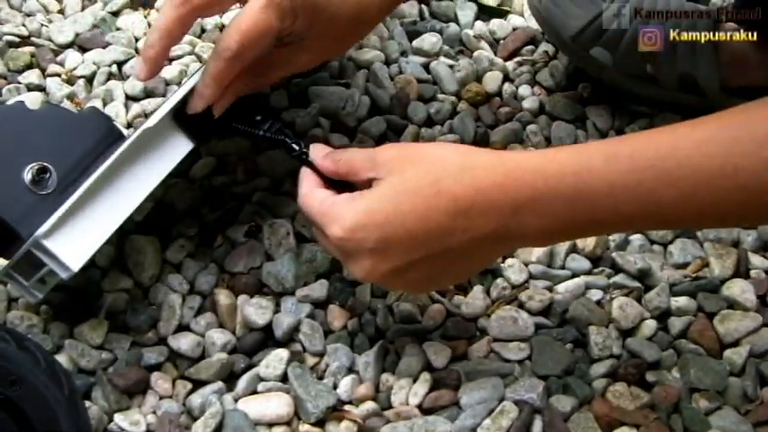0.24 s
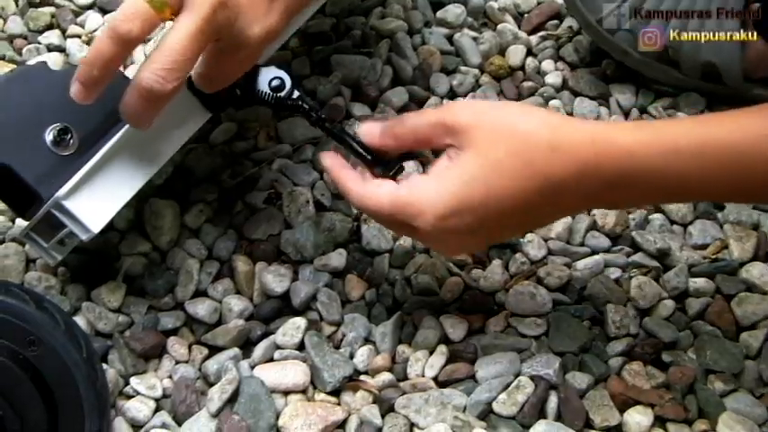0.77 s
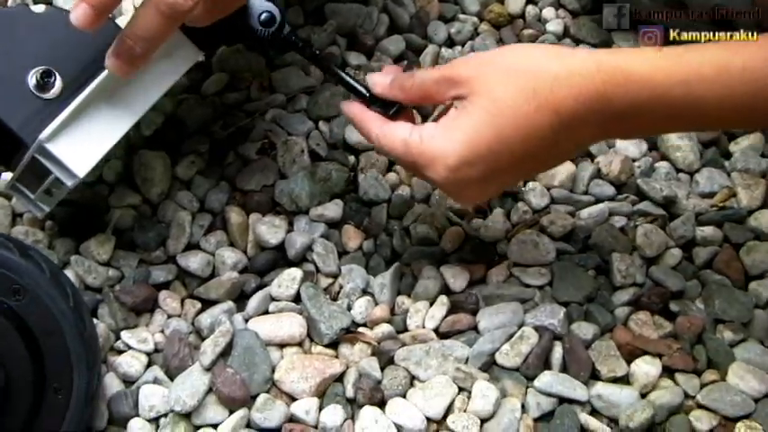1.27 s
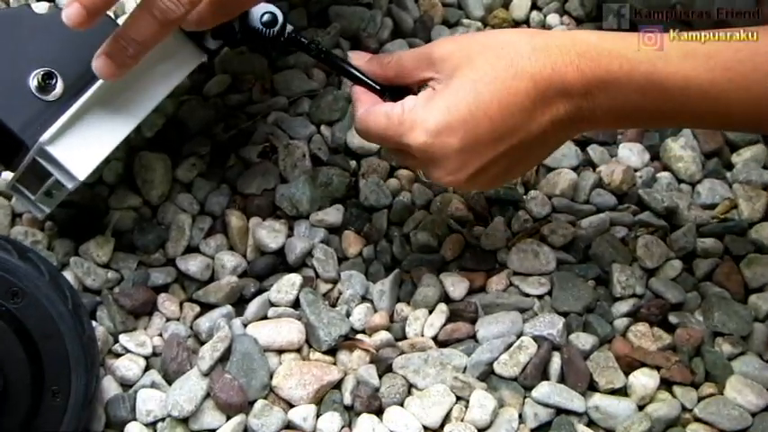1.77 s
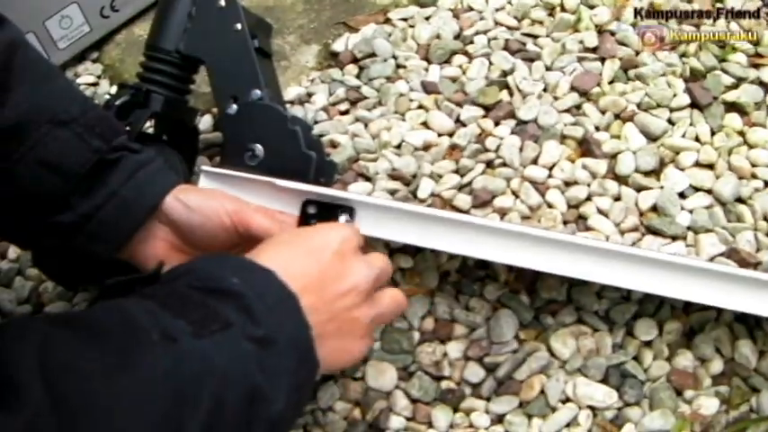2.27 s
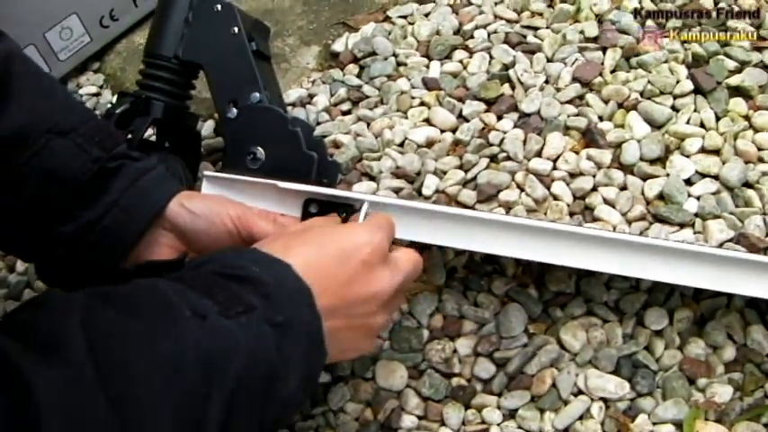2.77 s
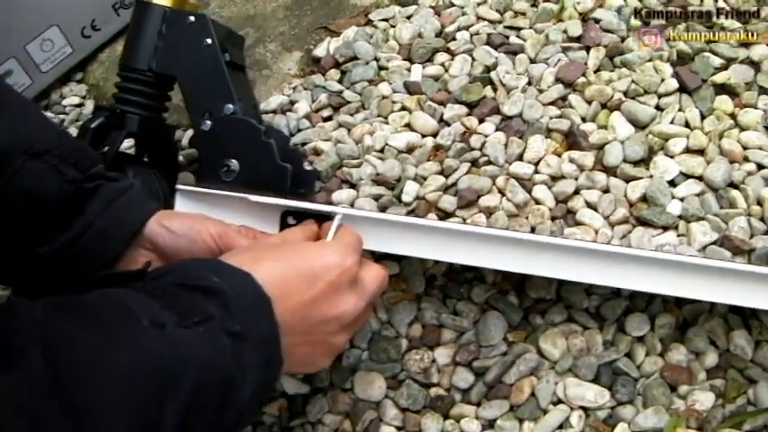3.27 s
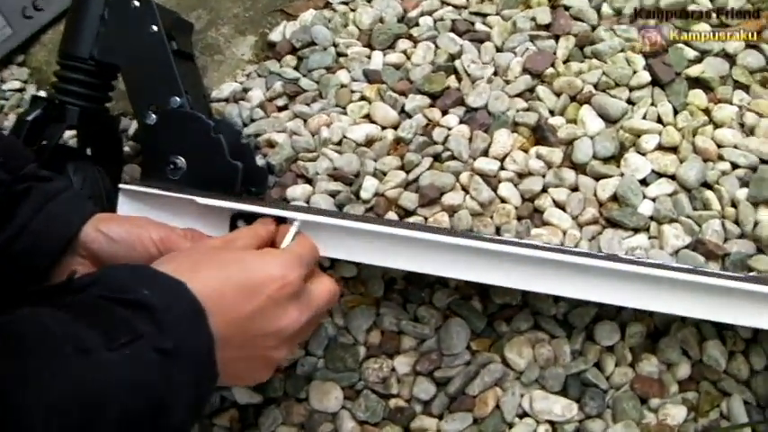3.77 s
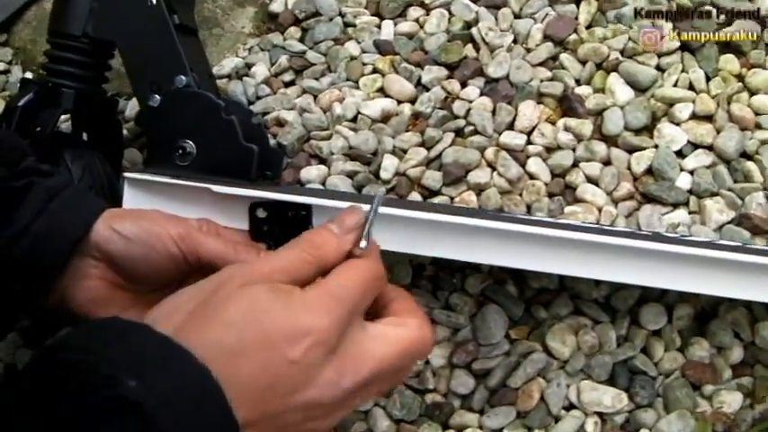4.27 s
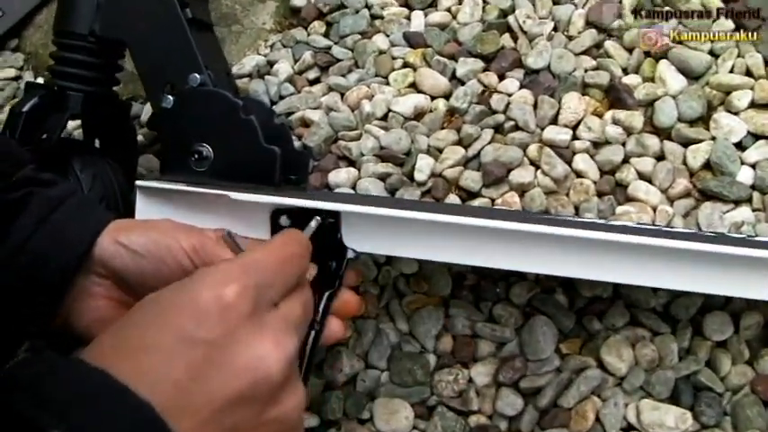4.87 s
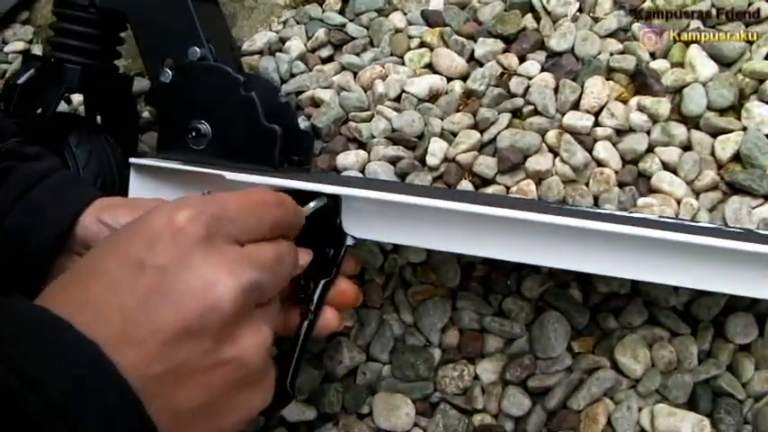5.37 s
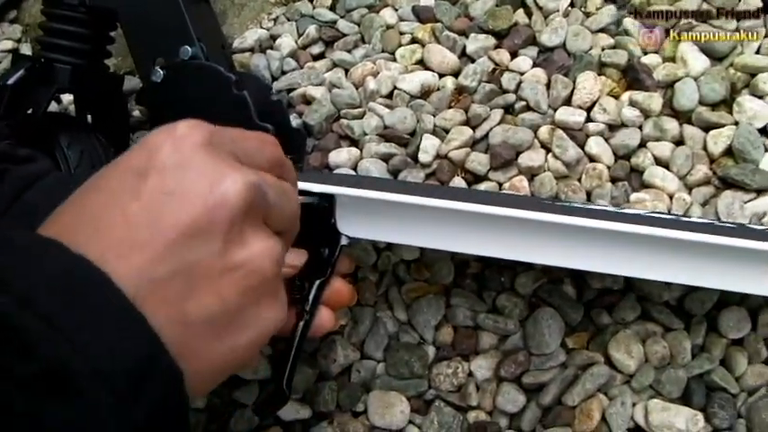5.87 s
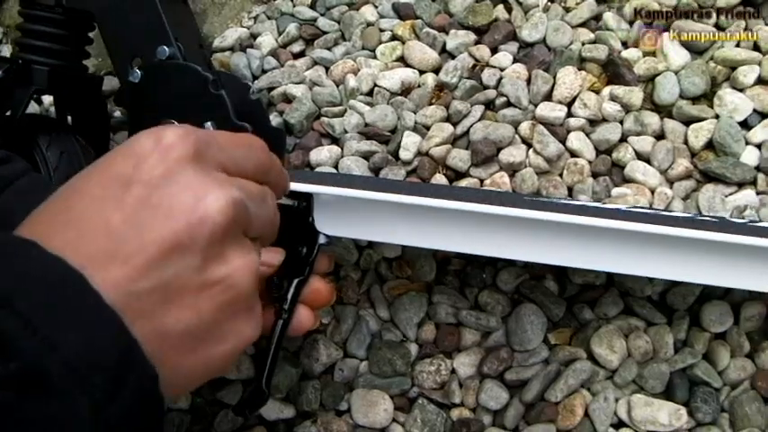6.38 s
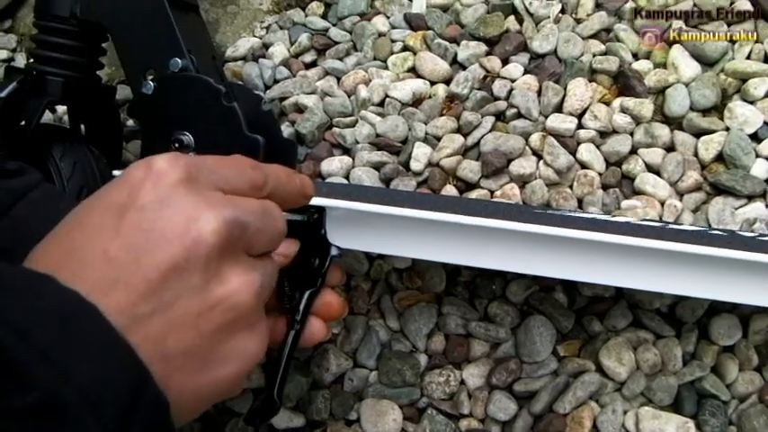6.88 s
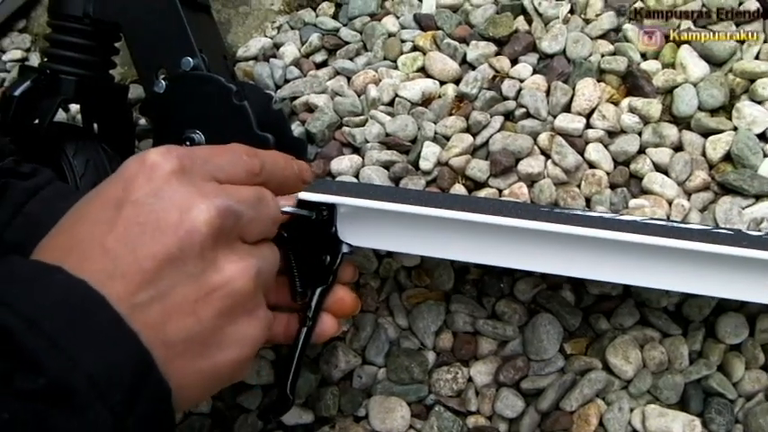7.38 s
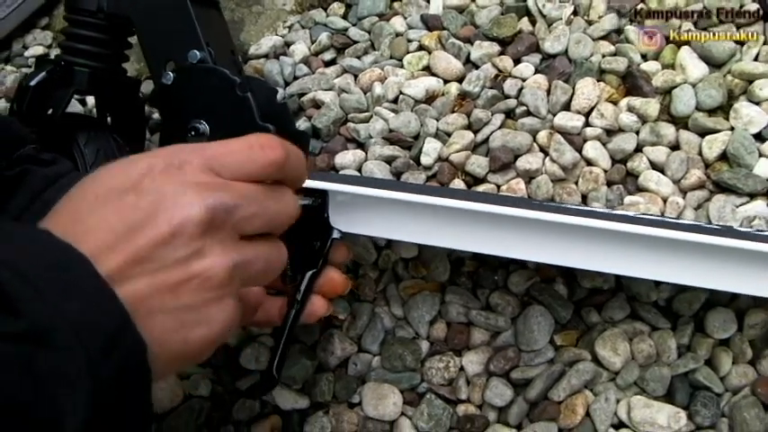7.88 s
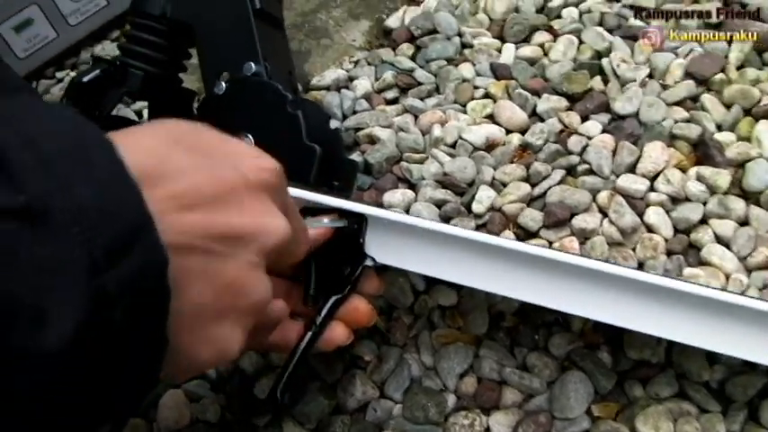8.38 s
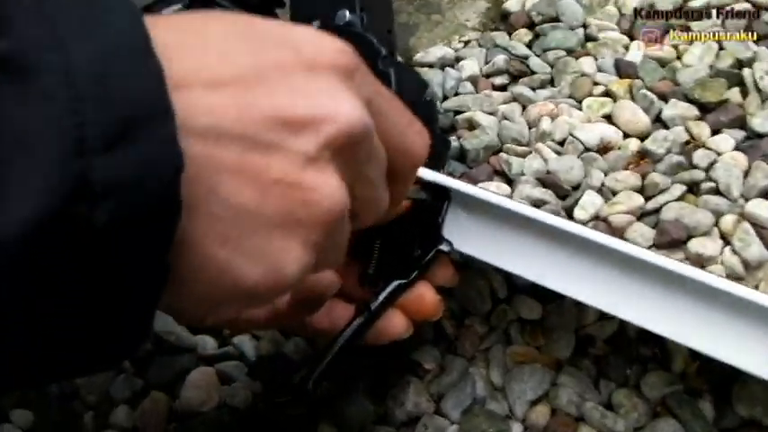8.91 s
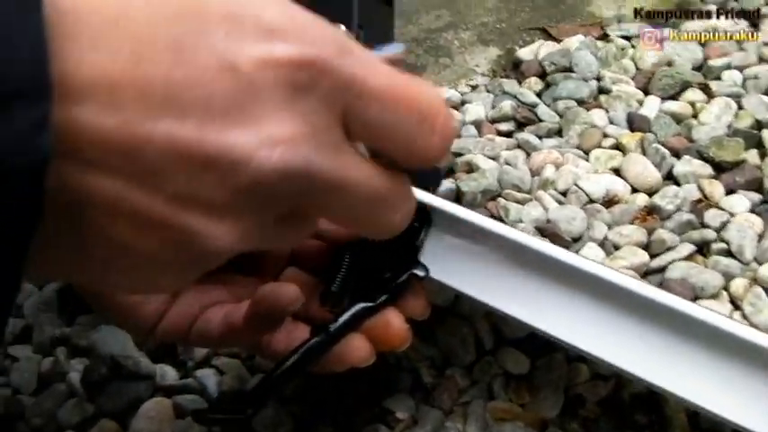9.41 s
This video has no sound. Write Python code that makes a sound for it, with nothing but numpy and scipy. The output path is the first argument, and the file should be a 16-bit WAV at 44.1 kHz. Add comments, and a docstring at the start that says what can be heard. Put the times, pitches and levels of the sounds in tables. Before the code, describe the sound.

Close, dry stereo handling outdoors, over faint low rumble and soft hiss. From 0 to 0.6 s fingers rub and small ticks cluster around 0.4, with a weak hum until 0.7. At 0.95-1.2 a tool knocks a hollow aluminium tube, ringing briefly, with rubbing and ticks; lighter knocks continue to 1.75. Complete silence from 1.8 to 2.05, then the air returns with a barely audible wavering drone. A bright steel clink at 2.27 has a weaker repeat at 2.33. Between 2.6 and 4 s, sleeve and skin rub with soft low bumps, gritty ticks and a tiny high squeak at 3.29. The loudest event is a rapid lever clack at 4.71. Ticks follow near 5.15, a smaller clack at 6.05, then sparse faint contacts. Rubbing and crisp ticks build at 8.2-8.5, with a firm thock at 8.81 and fading rubs past 9.

```python
"""Putting a scooter together

Hands assemble a scooter on gravel outdoors, heard close by in stereo.
A ratchet wrench knocks on the hollow aluminium stem, which rings as a sum of fading sine waves.
After a short silence a bolt is worked into the folding clamp: dry noise-burst ticks, ringing steel clinks
and one loud clack of the lever. Skin, cuffs and sleeves rub as shaped noise over a quiet outdoor rumble and hiss.
"""
import sys
import numpy as np
from scipy import signal
from scipy.fft import rfft, irfft, next_fast_len
from scipy.io import wavfile
from scipy.ndimage import uniform_filter1d

SR = 44100
rng = np.random.default_rng(int(sys.argv[2]) if len(sys.argv) > 2 else 0)


def to_wav(s):
    """Save 16-bit WAV."""
    ch = np.atleast_2d(s).T  # columns
    pcm = np.round(np.clip(ch, -1, 1) * 32767)  # PCM
    wavfile.write(sys.argv[1], SR, pcm.astype(np.int16))


N = 425556
TIME = np.arange(N) / SR  # seconds
RING = np.arange(SR // 3) / SR  # seconds since a hit; "t60" below is the time to fade by 60 dB

# Background: colour of the outdoor air. Each row: frequency in Hz, relative level in dB per Hz.
AIR_COLOUR = [(25, -4.5), (50, -4.5), (85, 8), (120, 7.5), (170, -0.5), (260, -13.5), (390, -3),
              (520, -9.5), (1000, -15.5), (1700, -14), (4500, -15), (7500, -16.5), (11000, -20.5),
              (16000, -24)]
# How much the air differs between left and right. Each row: frequency in Hz, side minus mid in dB.
AIR_WIDTH = [(60, -21), (110, -27), (200, -12.5), (380, -14), (700, -9.5), (1290, -8.5), (2380, -8),
             (4400, -4), (8120, -0.5), (15000, 1.5)]
# The same for the near sounds. Each row: frequency in Hz, side minus mid in dB.
NEAR_WIDTH = [(1000, -24.5), (2500, -42), (5000, -15.5), (8000, -6), (12000, -3)]
# Colour the microphone ports give to near sounds. Each row: frequency in Hz, gain in dB.
PORT_COLOUR = [(6000, -0.5), (6700, -1), (7300, 4), (7620, 2), (7850, -9.5), (8150, 1), (8800, -2.5),
               (9800, -0.5), (10800, 6.5), (12200, 0), (14000, -8.5)]
# The jacket sleeve brushes the frame. Each row: time of the peak in seconds, level in dB, length in seconds.
SLEEVE_STROKES = [(2.65, -60.5, 0.75), (2.98, -57.5, 0.2), (3.62, -67, .6), (8.85, -80, 2.6)]
# Fingers and cuffs stroke the parts. Each row: time of the peak in seconds, level in dB, length in seconds.
HAND_STROKES = [(.03, -57, 0.47), (.42, -52.5, .2), (.84, -50, 0.48), (.95, -49, 0.14), (1.15, -47.5, 0.11),
                (1.35, -51.5, 0.21), (2.62, -58, 0.91), (2.99, -52.5, 0.19), (3.315, -48.5, 0.19),
                (3.4, -57, 0.063), (3.56, -49, 0.064), (3.625, -45, 0.11), (3.96, -52, 0.17),
                (4.35, -50.5, 0.34), (4.47, -48.5, 0.17), (4.805, -43.5, 0.11), (5.12, -58, 0.38),
                (7.65, -57.5, 0.24), (8.23, -55, 0.5), (8.45, -44.5, 0.15), (8.63, -54.5, 0.5),
                (8.865, -47, 0.18), (9.01, -50.5, 0.52), (9.2, -58, 0.45)]
# Colour of rubbing cloth and skin. Each row: frequency in Hz, relative level in dB per Hz.
CLOTH_COLOUR = [(200, -25), (500, 0.5), (1000, -11), (1900, 2.5), (4000, 1), (6500, 2), (12000, -8.5),
                (16000, -6)]
# Soft bumps of the hands on the frame. Each row: start in seconds, level in dB.
HAND_BUMPS = [(2.724, -41.5), (2.989, -48), (3.228, -45.5), (3.671, -44), (3.728, -41.5)]
# Hollow thocks of the firmest contacts. Each row: start in seconds, level in dB.
THOCK_HITS = [(.412, -48.5), (8.473, -51), (8.8105, -47)]
# Light touches that ring one note of a small steel part. Each row: start in seconds, level in dB, pitch in Hz.
PING_NOTES = [(1.157, -41, 6320), (1.492, -49.5, 6800), (1.649, -48, 3280), (3.279, -45, 6100),
              (5.26, -52.5, 4050), (6.87, -59, 6050)]
# Dry contacts of tool, bolt and clamp. Each row: start in seconds, level in dB, centre in Hz, t60 in seconds.
TICK_HITS = [(.186, -43.5, 3960, .017), (0.3518, -48, 2290, 0.016), (.3753, -46, 4770, .006),
             (.3907, -48, 2800, .03), (.3984, -40.5, 3920, 0.0043), (.412, -37, 3700, 0.014),
             (0.8228, -44.5, 8000, .009), (.9497, -51, 4480, .02), (.978, -45, 4960, .04),
             (1.058, -48, 4470, .015), (1.1386, -38, 4400, .026), (1.1452, -42, 3200, .01),
             (1.3212, -47.5, 4700, 0.01), (1.339, -45, 5830, 0.025), (1.452, -43.5, 4600, 0.011),
             (2.9288, -43, 4030, 0.0067), (2.9833, -52, 3800, 0.0068), (2.9884, -33, 4350, .003),
             (3.231, -39.5, 6750, 0.0023), (3.2626, -46, 4500, .008), (3.298, -37, 4330, 0.062),
             (3.3143, -45, 5700, .018), (3.3269, -42, 4000, 0.041), (3.34, -41, 5800, 0.011),
             (3.4, -47.5, 2600, .045), (3.4643, -47.5, 6660, .013), (3.534, -44.5, 3500, 0.038),
             (3.5679, -32.5, 7300, 0.0042), (3.6182, -46, 2700, .045), (3.978, -44.5, 2870, 0.019),
             (4.0772, -47.5, 3400, .02), (4.359, -46.5, 4200, .015), (4.4389, -47, 4200, 0.0051),
             (4.474, -46, 2720, 0.034), (4.783, -40.5, 5000, .009), (4.7872, -40, 5000, .012),
             (4.883, -47.5, 4450, 0.0052), (5.144, -42, 3820, 0.032), (5.162, -39, 5900, .024),
             (5.1702, -39, 6330, 0.023), (6.048, -38, 4750, 0.014), (7.424, -45, 3770, 0.027),
             (7.561, -53, 3500, 0.022), (7.622, -48, 3060, 0.034), (8.1945, -48.5, 7000, .02),
             (8.396, -43, 5000, 0.0079), (8.428, -39, 4370, 0.026), (8.4465, -39.5, 4700, .018),
             (8.47, -35.5, 2920, 0.0073), (8.4725, -32, 7400, 0.0052), (8.4923, -46, 3900, .005),
             (8.538, -49, 4800, .015), (8.8103, -37.5, 2150, 0.0081), (8.828, -45, 8000, .01)]
# The bolt squeaks in its hole. Each row: start in seconds, level in dB, brightness in Hz.
BOLT_SQUEAKS = [(3.2855, -35, 13000), (3.288, -41, 12900)]
# The steel bolt clinks. Each row: start in seconds, level in dB, brightness in Hz.
BOLT_CLINKS = [(2.2741, -31, 8100), (2.280, -44, 6000), (2.3317, -44, 7000), (2.3389, -52, 5000)]
# The clamp lever strikes its seat. Each row: start in seconds, level in dB, brightness in Hz.
LEVER_CLACKS = [(3.149, -46.5, 3120), (4.7077, -25, 5200), (4.7178, -25, 5000), (4.7275, -32.5, 4530),
                (6.0485, -40, 5900)]
# Knocks that ring the stem. Each row: start in seconds, level in dB, brightness in Hz.
STEM_KNOCKS = [(.413, -49, 1800), (.472, -47.5, 2500), (.626, -53, 600), (.9652, -36.5, 2700),
               (.9771, -33, 1920), (1.1229, -42.5, 2500), (1.143, -41, 1900), (1.157, -40.5, 4000),
               (1.1726, -43.5, 2520), (1.4061, -44, 1300), (1.5328, -48, 2990), (1.5848, -48.5, 2980),
               (1.6366, -48, 2960), (1.6465, -45, 4000), (1.7435, -40.5, 1470), (3.728, -52, 600),
               (3.752, -47.5, 650)]

# Ringing notes of the frame. Each row: frequency in Hz, relative level in dB, t60 in seconds.
FRAME_MODES = [(72.4, 4.5, 0.14), (92.3, 3, 0.11), (128, 0.5, 0.12)]
# Ringing notes of the bolt hole. Each row: frequency in Hz, relative level in dB, t60 in seconds.
BORE_MODES = [(4280, -13, .025), (4850, -8, 0.049), (6200, -13, .02), (7700, -4, .04), (9150, -5, .03),
              (10830, -3, .035), (11700, -8, .02), (11890, 5.5, 0.034)]
# Ringing notes of the bolt. Each row: frequency in Hz, relative level in dB, t60 in seconds.
BOLT_MODES = [(3513, -13.5, 0.083), (4260, -8, 0.045), (4370, -17, .025), (4933, -17, 0.033),
              (5200, -19, .025), (6020, 0, 0.033), (6000, -2, .026), (7560, -8, .044), (7650, 3.5, 0.051),
              (9400, -5, 0.031), (11960, 8, 0.011)]
# Ringing notes of the lever. Each row: frequency in Hz, relative level in dB, t60 in seconds.
LEVER_MODES = [(1870, -6.5, 0.039), (1950, -3, 0.061), (2150, -4, 0.048), (2376, -8.5, 0.026),
               (2460, 2.5, 0.045), (2710, -7.5, .045), (2960, -8, .04), (3270, -5, 0.04), (3400, -6, 0.077),
               (3610, -8, .03), (3724, 4, 0.06), (3800, 0.5, 0.046), (4060, -5, 0.054), (4300, -12, 0.052),
               (4290, -5, 0.052), (5500, -14, 0.028), (6150, -1.5, .025), (7350, -11, .025)]
# Ringing notes of the stem. Each row: frequency in Hz, relative level in dB, t60 in seconds.
STEM_MODES = [(513, -15.5, 0.069), (638, -12, 0.14), (660, -29, .15), (1190, -10.5, 0.12), (1203, -5, 0.15),
              (1248, -3.5, 0.063), (1535, -8, 0.1), (1894, -18.5, 0.094), (1926, -5.5, 0.045),
              (1928, 4, 0.041), (2008, -9, 0.21), (2140, -13, .1), (2300, 0, .045), (2450, -1.5, 0.055),
              (2850, -0.5, .04)]
# The short silence. In order: fade-out start, fade-out end, fade-in start, fade-in end, all in seconds.
SILENCE_TIMES = (1.803, 1.812, 2.045, 2.075)

AIR_DB = -53.5
HUM_HZ, HUM_DB = 332, -63
HUM_TIMES = (0.35, 0.39, 0.67, 0.72)  # seconds: starts, is full, starts to fade, is gone
DRONE_HZ, DRONE_WIDTH_HZ, DRONE_DB, DRONE_FROM_S = 389.7, 37, -65.5, 2
RISE_SHARE = 0.46  # share of a stroke's length spent swelling
STROKE_EDGE_DB = -9.5  # level at both ends of that length, relative to the peak
GRIP_DB = -67  # the hands never lie quite still
SLIPS_PER_S = 14  # chances for a slip, used only if the push is strong enough
SLIP_DB = -2  # relative to the stroke
SLIP_FROM_DB = -56.5  # a gentler push shifts nothing
SLIP_LOW_HZ, SLIP_HIGH_HZ, SLIP_T60_S = 4000, 10000, 0.01
BUMP_HZ = 200  # brightness of a soft hand
THOCK_LOW_HZ, THOCK_HIGH_HZ, THOCK_T60_S = 384, 846, 0.0094
TICK_OCTAVES = 1.64  # width of a contact's band
REBOUND_S, REBOUND_DB = 0.0048, -9
TOP_HZ = 15850  # nothing much is heard above this


def undb(db):
    """Turn decibels into gain."""
    return 10 ** (np.asarray(db) / 20)


def unit(x):
    """Scale to an average (rms) level of 1."""
    return x / np.sqrt(np.mean(x ** 2))


def blow(x, db):
    """Scale a hit so that its energy, spread over 10 ms, has this level."""
    return x * undb(db) * np.sqrt(SR / 100 / np.sum(x ** 2))


def fade(t60):
    """Die away exponentially, by 60 dB in t60 seconds."""
    return np.exp(-np.log(1000) * RING / t60)


def colour(x, points):
    """Filter through (Hz, dB) points without any sound coming early (minimum phase)."""
    hz, db = np.transpose(points)
    size = 2 * next_fast_len(len(x) // 2 + 1)
    f = np.maximum(np.arange(size // 2 + 1) * SR / size, 1)
    log_gain = np.log(undb(np.interp(np.log(f), np.log(hz), db)))
    cepstrum = irfft(log_gain)
    # fold the second half onto the first, so the filter only looks back in time
    cepstrum[1:size // 2] *= 2
    cepstrum[size // 2 + 1:] = 0
    response = np.exp(rfft(cepstrum))
    return irfft(rfft(x, size) * response)[:len(x)]


def butter(x, hz, kind, order=2):
    """Smooth low-pass or high-pass filter; a higher order is steeper."""
    return signal.sosfilt(signal.butter(order, hz, kind, fs=SR, output="sos"), x)


def walk(rate):
    """Random wander with a spread of 1, taking about this many new values per second."""
    hold = int(SR / rate)
    steps = np.repeat(rng.standard_normal(N // hold + 1), hold)
    return unit(uniform_filter1d(steps, hold)[:N])


def add(track, s, sound):
    """Mix a sound in at time s."""
    start = int(s * SR)
    track[start:start + len(sound)] += sound[:len(track) - start]


def stereo(mid, side):
    """Make left and right from mid and side."""
    return np.array([mid + side, mid - side])


def air(swell_db=1.07):
    """Distant rumble and hiss: coloured noise whose level gently swells."""
    mid, side = (unit(colour(rng.standard_normal(N), AIR_COLOUR)) for _ in range(2))
    level = undb(AIR_DB + swell_db * walk(8.6))
    return stereo(mid, colour(side, AIR_WIDTH)) * level


def hum():
    """A brief, faint far hum: one sine wave that fades in and out."""
    tone = np.sqrt(2) * np.sin(2 * np.pi * HUM_HZ * TIME)  # rms 1
    return undb(HUM_DB) * tone * np.interp(TIME, HUM_TIMES, [0, 1, 1, 0])


def drone():
    """A distant drone: slow noise shifted up to a pitch, so that it wavers."""
    waver = butter(rng.standard_normal(N) + 1j * rng.standard_normal(N), DRONE_WIDTH_HZ / 2, "low")
    tone = unit(np.real(waver * np.exp(2j * np.pi * DRONE_HZ * TIME)))
    return undb(DRONE_DB) * tone * (TIME > DRONE_FROM_S)


def effort(strokes):
    """Each stroke swells to its peak and dies away; overlapping strokes add in power."""
    power = np.zeros(N)
    for s, db, length in strokes:
        away = np.maximum((s - TIME) / RISE_SHARE, (TIME - s) / (1 - RISE_SHARE)) / length
        near = away < 6  # beyond this it is too faint to matter
        power[near] += undb(db + STROKE_EDGE_DB * away[near]) ** 2
    return np.sqrt(power)


def sleeve(low_hz=380, high_hz=1100):
    """Heavy cloth gives a dull, uneven brushing: band-limited noise."""
    brush = butter(butter(rng.standard_normal(N), low_hz, "high"), high_hz, "low")
    return unit(brush) * effort(SLEEVE_STROKES) * undb(2 * walk(30))


def rubbing(grains_per_s=700, grain_spread_db=2.5, grain_db=-5, flutter_db=2.5, split_hz=4000):
    """Cloth and skin slide: a soft hiss with tiny catches, its colour shifting with the grip."""
    happens = rng.random(N) < grains_per_s / SR
    direction = rng.choice([-1, 1], N)
    size = undb(grain_spread_db * np.minimum(rng.exponential(size=N), 5))
    hiss = rng.standard_normal(N) + undb(grain_db) * unit(happens * direction * size)
    # the dark and bright halves flutter separately
    slide = sum(butter(hiss, split_hz, kind, order=3) * undb(flutter_db * walk(50))
                for kind in ("low", "high"))
    return unit(colour(colour(slide, CLOTH_COLOUR), PORT_COLOUR))


def grit(grains_per_s=130, low_hz=1600, high_hz=11000, t60=0.0042, spread_db=3, level_db=-8):
    """Tiny hard contacts inside the rubbing, each ringing briefly at its own pitch."""
    out = np.zeros(N)
    short = RING[:len(RING) // 20]
    decay = fade(t60)[:len(short)]
    for when, pitch, size in rng.random((int(grains_per_s * N / SR), 3)):
        hz = low_hz * (high_hz / low_hz) ** pitch
        grain = np.sin(2 * np.pi * hz * short) * decay
        add(out, when * N / SR, grain * undb(-spread_db * np.log(max(size, 0.03))))
    return unit(colour(out, PORT_COLOUR)) * undb(level_db)


def slips(push):
    """While the fingers push hard enough, the loose parts shift with faint random ticks."""
    out = np.zeros(N)
    for when, pitch in rng.random((int(SLIPS_PER_S * N / SR), 2)):
        at = int(when * N)
        if push[at] > undb(SLIP_FROM_DB):
            hz = SLIP_LOW_HZ * (SLIP_HIGH_HZ / SLIP_LOW_HZ) ** pitch
            add(out, at / SR, push[at] * tick(SLIP_DB, hz, SLIP_T60_S))
    return out


def struck(hits, modes, crack_db, crack_hz, crack_t60, scatter_db=1.0):
    """Blows ring a part's modes, each a little differently; a softer contact dulls the top."""
    out = np.zeros(N)
    for s, db, bright_hz in hits:
        ring = np.zeros(len(RING))
        for hz, mode_db, t60 in modes:
            size, sign = rng.standard_normal(2)
            gain = np.sign(sign) * undb(mode_db + scatter_db * size)
            ring += gain * fade(t60) * np.sin(2 * np.pi * hz * RING)
        # nothing radiates below the lowest mode, which stands first
        ring = butter(ring, 0.73 * modes[0][0], "high", order=6)
        crack = butter(rng.standard_normal(len(RING)) * fade(crack_t60), crack_hz, "high", order=8)
        ring, crack = (butter(part, bright_hz, "low", order=3) for part in (ring, crack))
        add(out, s, blow(blow(ring, 0) + blow(crack, crack_db), db))
    return out


def frame_bumps():
    """Soft hands set off only the low, short notes of the frame."""
    hits = [(s, db, BUMP_HZ) for s, db in HAND_BUMPS]
    return struck(hits, FRAME_MODES, crack_db=-13.5, crack_hz=60, crack_t60=0.066)


def thocks():
    """The low, quickly damped body of a firm contact: a short band of noise."""
    out = np.zeros(N)
    for s, db in THOCK_HITS:
        body = rng.standard_normal(len(RING)) * fade(THOCK_T60_S)
        body = butter(body, THOCK_LOW_HZ, "high", order=3)
        add(out, s, blow(butter(body, THOCK_HIGH_HZ, "low", order=3), db))
    return out


def pings(t60=0.042, rough=0.27):
    """One short note each, roughened by the sliding contact."""
    out = np.zeros(N)
    for s, db, hz in PING_NOTES:
        chatter = 1 + rough * unit(butter(rng.standard_normal(len(RING)), 250, "low"))
        add(out, s, blow(chatter * fade(t60) * np.sin(2 * np.pi * hz * RING), db))
    return out


def tick(db, hz, t60, snap=0.35, snap_t60=0.0047, tail_db=-16, tail_t60=0.082):
    """A contact is a snap, a short grating burst, one rebound and a weak scatter from the stones."""
    crack, grate, again, scatter = rng.standard_normal((4, len(RING)))
    hit = snap * blow(crack * fade(snap_t60), 0)
    hit += blow(grate * fade(t60), 0)
    hit += blow(scatter * fade(tail_t60), tail_db)
    add(hit, REBOUND_S, blow(again * fade(t60), REBOUND_DB))
    edge = 2 ** (TICK_OCTAVES / 2)
    hit = butter(butter(hit, hz / edge, "high", order=5), hz * edge, "low", order=4)
    return blow(colour(hit, PORT_COLOUR), db)


def ticks():
    """The distinct dry contacts of tool, bolt and clamp."""
    out = np.zeros(N)
    for s, db, hz, t60 in TICK_HITS:
        add(out, s, tick(db, hz, t60))
    return out


def squeaks():
    """The bolt squeaks in its hole, ringing the high notes of the bore."""
    return struck(BOLT_SQUEAKS, BORE_MODES, crack_db=-9, crack_hz=3460, crack_t60=0.015)


def clinks():
    """The small steel bolt rings high and briefly."""
    return struck(BOLT_CLINKS, BOLT_MODES, crack_db=-7.5, crack_hz=3030, crack_t60=0.0085)


def clacks():
    """The lever strikes its seat: many close notes with a strong crack of noise."""
    return struck(LEVER_CLACKS, LEVER_MODES, crack_db=-3.5, crack_hz=1950, crack_t60=0.02)


def stem_knocks():
    """The wrench knocks on the hollow stem, whose notes vary widely from blow to blow."""
    return struck(STEM_KNOCKS, STEM_MODES, crack_db=-9.5, crack_hz=525, crack_t60=0.049, scatter_db=3)


def near_field(x, spread_t60=0.016):
    """Hands, frame and stones reflect differently into the two ports, mostly in the treble."""
    reflections = rng.standard_normal(len(RING)) * fade(spread_t60)
    side = signal.fftconvolve(x, reflections / np.linalg.norm(reflections))[:N]
    return stereo(x, colour(side, NEAR_WIDTH))


def scene():
    """All the handling, close by, over the outdoor background."""
    outdoors = air() + hum() + drone()
    push = np.hypot(effort(HAND_STROKES), undb(GRIP_DB))
    hands = sleeve() + (rubbing() + grit()) * push + slips(push)
    parts = frame_bumps() + thocks() + pings() + ticks()
    parts += squeaks() + clinks() + clacks() + stem_knocks()
    return outdoors + near_field(hands + parts)


def record(dry):
    """The sound drops out for about a quarter of a second; the top is cut steeply."""
    gate = np.interp(TIME, SILENCE_TIMES, [1, 0, 0, 1])
    top_cut = signal.ellip(10, 0.2, 80, TOP_HZ, fs=SR, output="sos")
    return signal.sosfilt(top_cut, dry * gate)


dry = scene()
out = record(dry)
to_wav(out)
```